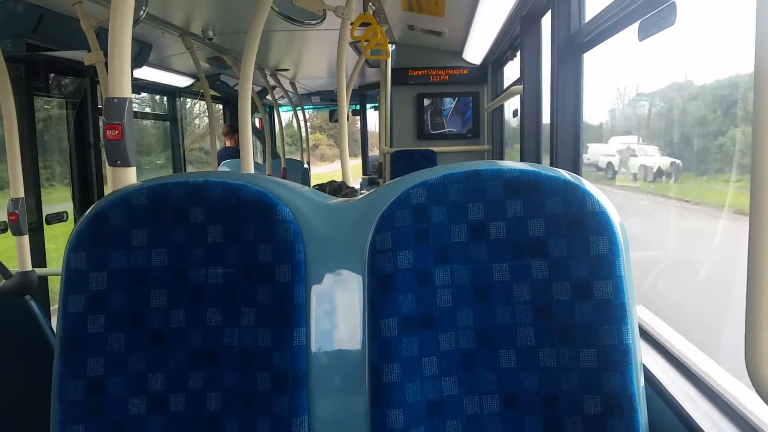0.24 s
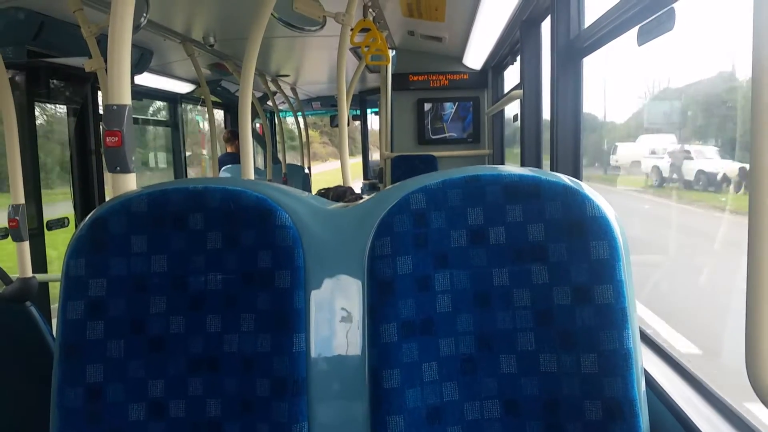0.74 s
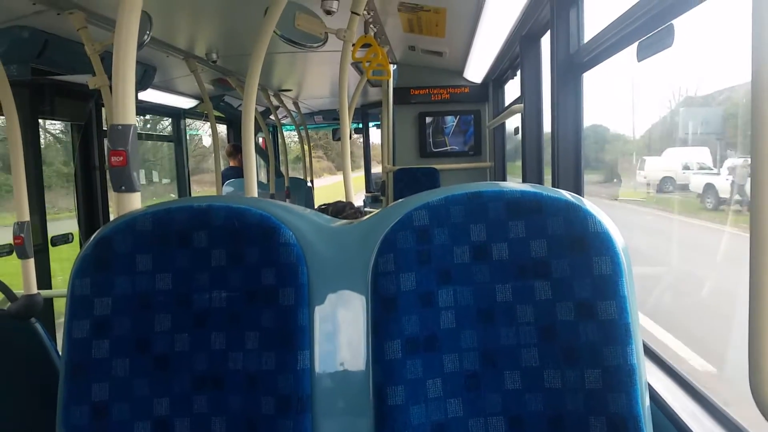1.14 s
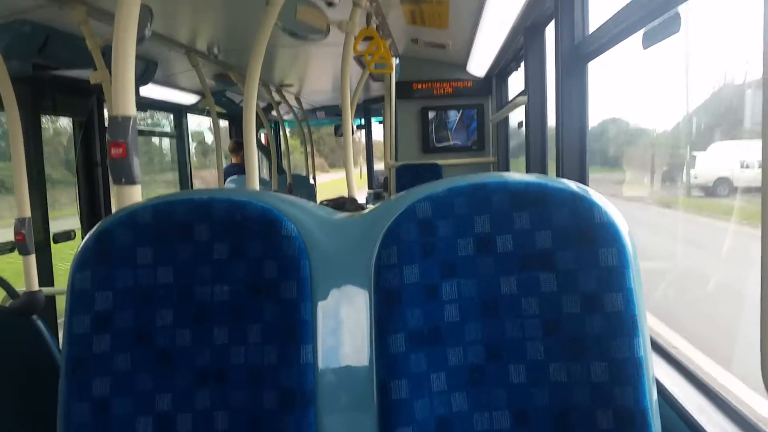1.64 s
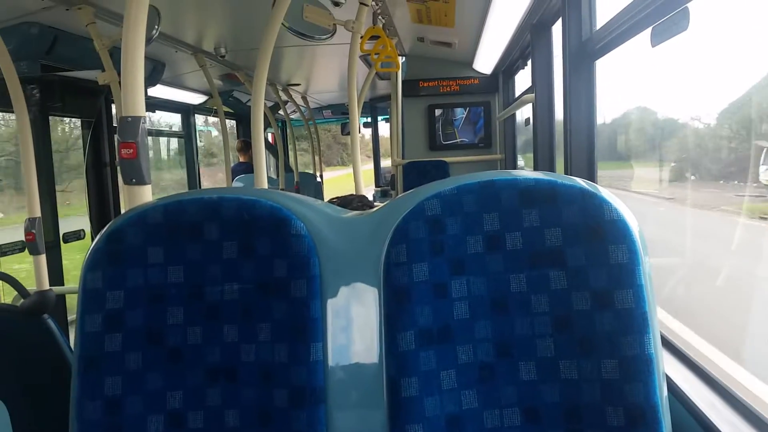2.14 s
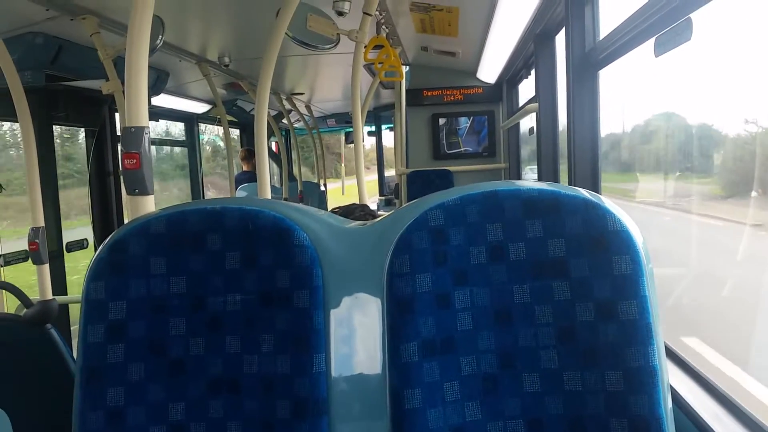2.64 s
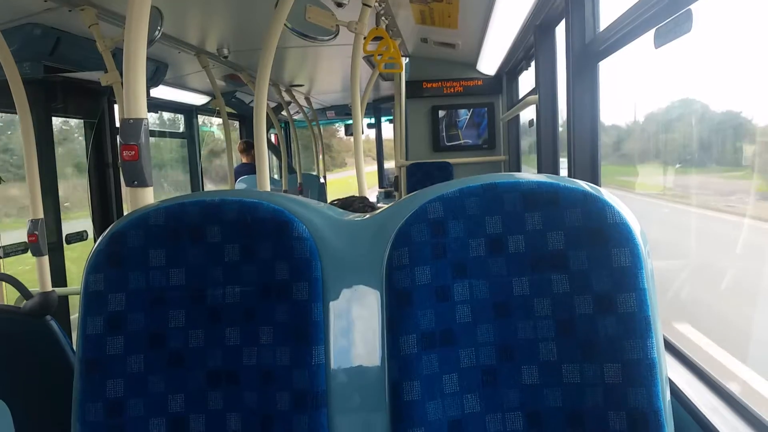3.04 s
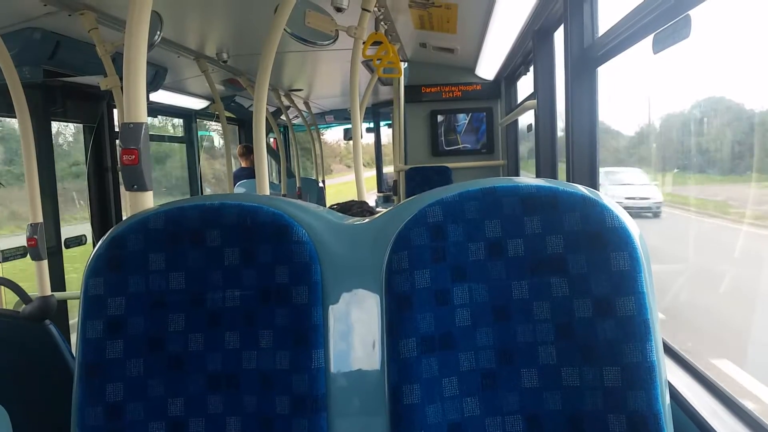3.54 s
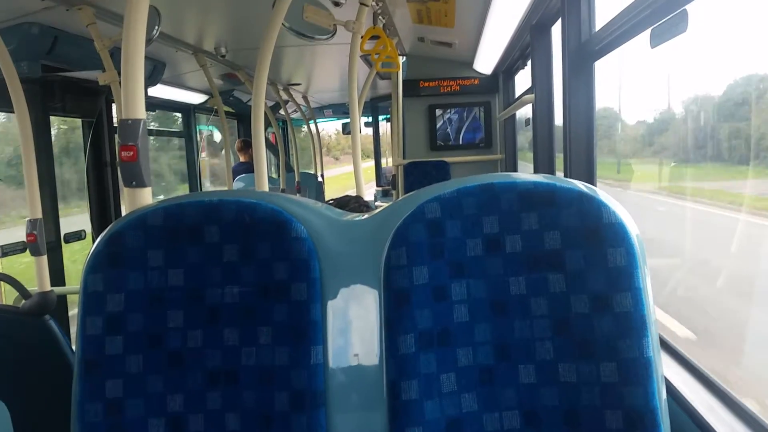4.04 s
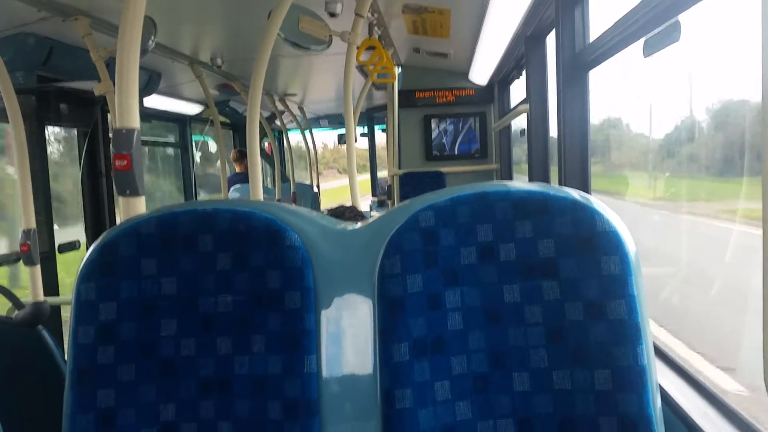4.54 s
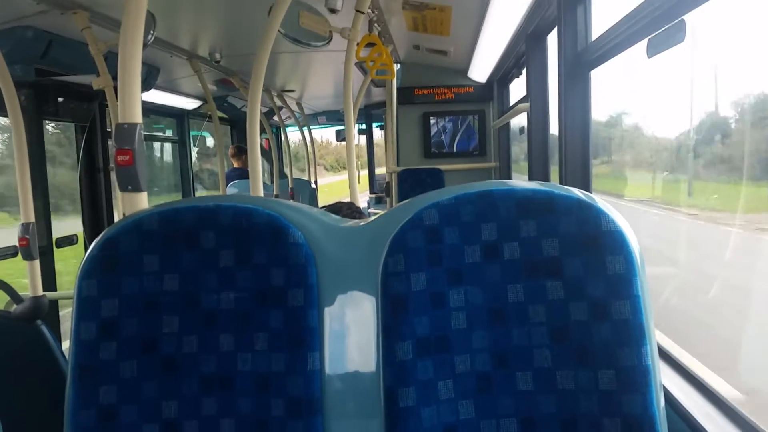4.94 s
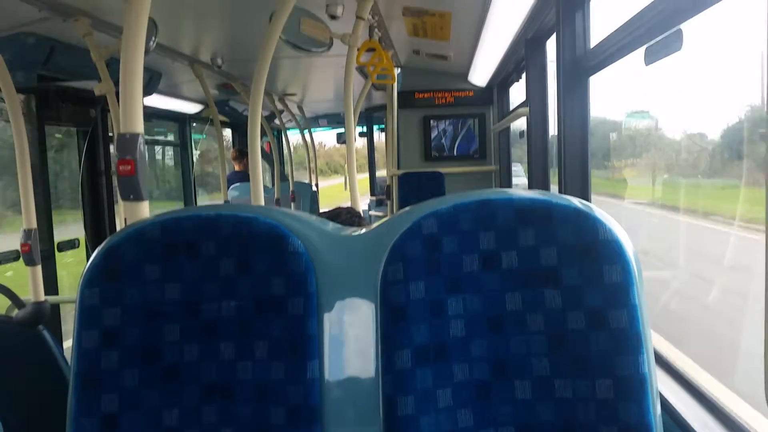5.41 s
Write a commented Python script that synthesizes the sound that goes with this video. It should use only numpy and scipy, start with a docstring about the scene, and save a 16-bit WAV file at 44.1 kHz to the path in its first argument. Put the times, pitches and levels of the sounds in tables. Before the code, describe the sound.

From a rear seat inside a bus, a low diesel drone pulses steadily and rises slightly as the vehicle gathers speed in one gear. Road rumble and tyre noise fill the cabin, along with a faint gear whine, a thin high whistle and a light hiss. Bumps bring two spells of brief rattling from loose fittings, with a smoother stretch and one sharp click between them.

```python
"""A six-cylinder diesel engine drones inside a bus that slowly gathers speed in one gear.
Its harmonics beat once per cycle and sweep through the cabin's standing waves, while its firings
modulate a roar. Pump hum, gear whine and a thin turbocharger whistle rise with it; a fan holds its pitch.
Beneath them the uneven road forces the body to rumble, loose trim rattles on the bumps, and air hisses."""
import sys
import numpy as np
from scipy import signal
from scipy.fft import rfft, irfft, next_fast_len
from scipy.io import wavfile

SR = 44100
rng = np.random.default_rng(int(sys.argv[2]) if len(sys.argv) > 2 else 0)


def inscribe(sig):
    """Save sig as 16-bit PCM at rate SR to the path in sys.argv[1].

    A 1-D sig is mono; a 2-D sig holds one channel per row.
    Samples are clipped to [-1, 1] before scaling.
    """
    pcm = np.round(np.clip(np.atleast_2d(sig).T, -1, 1) * 32767)
    wavfile.write(sys.argv[1], SR, pcm.astype(np.int16))


N = 250047
TIME, HZ = np.arange(N) / SR, np.fft.rfftfreq(N, 1 / SR)

# Likeness of left and right in the cabin's sound field: [f/Hz, correlation]
COHERENCE = [(60, 0.96), (99, 0.94), (160, 0.85), (270, 0.86), (450, 0.8), (740, 0.5), (1220, 0.06),
             (2010, -0.03), (3330, 0.0), (5500, 0.0), (9080, 0.02), (15000, 0.03)]
# Balance of that field: [f/Hz, left minus right/dB]
BALANCE = [(60, -0.5), (92, -0.5), (140, -1.0), (210, -1.0), (330, 1.0), (500, 2.0), (770, -0.5),
           (1170, -0.5), (1790, -2.0), (2740, -5.0), (4190, -7.5), (6410, -5.5), (9810, 3.5), (15000, 1.0)]
# Standing waves of the cabin: [f/Hz, half-width/Hz, gain at the seat/dB]
STANDING_WAVES = [(54.6, 1.2, 3), (82.02, 2.35, 6.5), (247.1, 3.95, 7), (326.5, 10.54, -15), (437, 3.3, 11),
                  (568, 19, 2.5)]
# Spectrum of rushing air: [f/Hz, relative density/dB]
HISS_SPECTRUM = [(1500, -10), (3200, 2), (4400, 1), (4900, -3), (6700, -2), (7600, -6.5), (9500, -3.5),
                 (11000, -12), (13500, -18), (16000, -17)]
# Envelope of the hiss: [t/s, relative level/dB]
HISS_ENVELOPE = [(0.0, -49), (1.56, -48.5), (2.15, -51), (4.23, -51.5), (4.45, -50), (5.67, -50)]
# Resonances of an air leak: [f/Hz, half-width/Hz, relative level/dB]
LEAK_RESONANCES = [(2930, 113, 10), (4160, 81, 4), (11600, 750, 2), (14900, 500, -11)]
# Heave of the body on the uneven road: [t/s, relative level/dB]
ROAD_BUMPS = [(0.0, -22.5), (0.54, -31.8), (1.02, -20.3), (1.5, -18.2), (2.22, -23.1), (2.46, -29.6),
              (2.62, -25.5), (4.54, -20.3), (4.78, -26.5), (5.1, -17.5), (5.34, -22.4), (5.66, -19.1)]
# Spectrum of the body panels: [f/Hz, relative density/dB]
PANEL_SPECTRUM = [(30, -25), (45, -2), (65, -3.5), (85, -1.5), (110, -4.5), (145, -5.5), (180, -10),
                  (225, -7.5), (280, -16), (350, -17.5), (500, -49), (900, -93)]
# Spectrum of the loose trim: [f/Hz, relative density/dB]
TRIM_SPECTRUM = [(700, -17), (1500, -8), (2100, -1), (2800, -3), (4400, -4.5), (7000, -5), (9500, -0.5),
                 (12000, -7), (16000, -13.5)]
# Rattles of the trim: [t/s, level before the envelope/dB, decay time/s, tilt/(dB per octave)]
TRIM_RATTLES = [(0.031, -41, 0.028, -3), (.28, -40.5, 0.015, 5), (0.32, -38, 0.014, -2),
                (.405, -43, 0.029, 12), (0.528, -39, 0.037, 1), (.553, -36.5, 0.023, -3),
                (1.092, -34, 0.053, -1), (1.117, -31, .045, -10), (1.299, -38, 0.032, 7),
                (1.33, -37.5, .037, 0), (1.378, -38, 0.045, 7), (1.4, -35, 0.031, -4),
                (1.46, -38.5, 0.089, 0), (1.515, -37.5, 0.048, 1), (1.551, -37, .04, -7),
                (4.336, -41.5, 0.028, -1), (4.402, -29.5, 0.044, -4), (4.413, -28.5, 0.037, -5),
                (4.511, -34, 0.026, -2.5), (4.665, -41, 0.043, 1), (4.82, -46, .04, 0),
                (4.885, -30.5, 0.0085, -5), (5.268, -46, .025, 4), (5.418, -40.5, .02, -2),
                (5.455, -43, .03, 1)]
# Single impacts of a small part: [t/s, level of the snap/dB, f/Hz]
TRIM_TICKS = [(0.79, -32, 5900), (1.0945, -35, 5500), (1.329, -29, 7700), (2.9872, -24, 6950),
              (2.989, -38, 14000), (2.99, -26.5, 3900), (3.127, -36, 7200), (4.256, -37, 6500),
              (5.243, -32, 6500)]
# Partials of an electric fan: [f/Hz, level/dB]
FAN_PARTIALS = [(2197, -51.5), (4394, -64.5), (6591, -65.5)]
# Envelope of the gear whine: [t/s, relative level/dB]
GEAR_ENVELOPE = [(0, -54), (0.16, -42.5), (0.4, -64), (0.65, -50), (1.2, -46), (1.4, -49), (1.85, -50.1),
                 (2.08, -44), (2.28, -51), (2.5, -39), (2.7, -48.2), (3.0, -47.5), (3.45, -53), (4.03, -45),
                 (4.22, -51.7), (4.56, -41.5), (4.8, -48.5), (5.66, -55)]
# Pump harmonics before the standing waves: [multiple of pump rate, level at MID_SPEED/dB, rise/(dB/Hz)]
PUMP_HARMONICS = [(3, -28, -3), (4, -53.5, -4), (5, -44.5, 3), (6, -47, -3.5), (9, -49.5, -2.5),
                  (12, -51.5, -1), (15, -59.5, -15)]
# Spectrum of tyre roar and engine clatter: [f/Hz, relative density/dB]
ROAR_SPECTRUM = [(200, -30.5), (350, -4.5), (420, -3), (510, 1.5), (600, -4), (730, -4.5), (830, -9),
                 (1000, -8), (1150, -11), (1330, -10.5), (1650, -14.5), (2150, -15), (2600, -23.5),
                 (3600, -39.5), (9000, -59)]
# Resonances of the engine bay: [f/Hz, half-width/Hz, level/dB]
CASING_RESONANCES = [(2004, 68, -46), (2925, 63, -54.5), (4410, 120, -65.5)]
# Engine speed, as the rate of four-stroke cycles: [t/s, f/Hz]
ENGINE_SPEED = [(0.0, 8.615), (0.7, 8.66), (1.4, 8.803), (2.1, 8.899), (2.8, 9.022), (3.5, 9.12),
                (4.2, 9.228), (4.9, 9.353), (5.67, 9.44)]
# Engine harmonics before the standing waves: [multiple of cycle rate, level at MID_SPEED/dB, rise/(dB/Hz)]
ENGINE_HARMONICS = [(5, -31.5, 13), (6, -22.5, 12.5), (8, -26, -1.5), (9, -21, 3.5), (10, -24.5, -6.5),
                    (11, -29.5, 0.5), (12, -23.5, -4), (13, -31.5, 11), (14, -30.5, -6), (16, -29.5, 9.5),
                    (17, -29.5, -6), (18, -30, -1), (20, -38.5, -12), (21, -39.5, 2), (23, -32.5, -3.5),
                    (24, -30.5, 0.5), (26, -41.5, 3), (27, -37, 7), (28, -39.5, -13), (29, -42, -18.5),
                    (32, -39, -9.5), (39, -50, -18.5)]
MID_SPEED = 9.03  # cycle rate/Hz in mid-climb; every rise is per Hz of cycle rate above it


def gain_of(db):
    """Amplitude grows tenfold with every 20 dB."""
    return 10 ** (np.asarray(db) / 20)


def unit_rms(x):
    """Normalisation to a mean square of 1."""
    return x / np.sqrt(np.mean(x ** 2) + 1e-20)


def spectrum(points, hz):
    """Interpolation of a table on a logarithmic frequency axis."""
    f, value = np.transpose(points)
    return np.interp(np.log(hz + 1), np.log(f + 1), value)


def curve(points):
    """Linear interpolation of a time table at every sample."""
    return np.interp(TIME, *np.transpose(points))


def add(mix, start_s, sound):
    """Superposition of a stereo sound on the mix."""
    part = mix[:, max(0, round(start_s * SR)):][:, :sound.shape[1]]
    part += sound[:, :part.shape[1]]


def drift(cutoff_hz, size=2048):
    """Low-pass filtered noise gives a slow random motion of rms 1."""
    hz = np.arange(size // 2 + 1) * SR / N
    slow = irfft(rfft(rng.standard_normal(size)) / (1 + (hz / cutoff_hz) ** 4))
    return unit_rms(np.interp(np.arange(N) * size / N, np.arange(size), slow))


def resonance_db(hz, centre_hz, half_width_hz):
    """A resonance curve, 6 dB down at one half-width from its centre."""
    return -20 * np.log10(1 + ((hz - centre_hz) / half_width_hz) ** 2)


def level_at_seat(hz, db, rise_db, speed):
    """A tone's level follows engine speed, and standing waves reinforce or cancel it at the seat."""
    waves_db = sum(lift * np.exp(-((hz - centre) / width) ** 2) for centre, width, lift in STANDING_WAVES)
    return db + rise_db * (speed - MID_SPEED) + waves_db


def diffuse_noise(shape_db):
    """A diffuse field of rms 1: left and right are coherent in the bass, independent in the treble."""
    size = next_fast_len(N, True)
    hz = np.fft.rfftfreq(size, 1 / SR)
    left, independent = rfft(rng.standard_normal((2, size)))
    coherence = np.clip(spectrum(COHERENCE, hz), -1, 1)
    right = coherence * left + np.sqrt(1 - coherence ** 2) * independent
    lean = gain_of(spectrum(BALANCE, hz) / 2)
    pair = np.array([left * lean, right / lean]) * gain_of(np.interp(hz, HZ, shape_db))
    return unit_rms(irfft(pair, size)[:, :N])


def resonant_noise(modes):
    """Resonances under random excitation each give a band of noise."""
    return sum(gain_of(db) * diffuse_noise(resonance_db(HZ, hz, width)) for hz, width, db in modes)


def tone(hz, db, wobble_hz, flutter, lean_db, lag_rad):
    """Interference with shifting reflections makes a tone flutter; left and right differ in phase."""
    phase = 2 * np.pi * np.cumsum(hz + wobble_hz * drift(8.6)) / SR
    sides = []
    for lag in (0, lag_rad):
        reflections = drift(30) * np.cos(phase) + drift(30) * np.sin(phase)
        sides.append(np.cos(phase + lag) + flutter * reflections)
    return gain_of(db) * unit_rms(np.array(sides) * gain_of([[lean_db / 2], [-lean_db / 2]]))


def air(swell_at_s=2.4, swell_half_width_s=0.3):
    """Rushing air radiates broadband hiss; a resonant leak swells once above a steady trickle."""
    hiss = diffuse_noise(spectrum(HISS_SPECTRUM, HZ)) * gain_of(curve(HISS_ENVELOPE) + 4 + 1.4 * drift(20))
    swell = np.exp(-((TIME - swell_at_s) / swell_half_width_s) ** 4)
    return hiss + resonant_noise(LEAK_RESONANCES) * (gain_of(-79) + gain_of(-64.5) * swell)


def road(speed):
    """Forced vibration: the uneven road heaves the body on its springs and shakes its panels."""
    bumps_db = curve(ROAD_BUMPS)
    heave = gain_of(bumps_db + 0.5) * diffuse_noise(resonance_db(HZ, centre_hz=33.5, half_width_hz=12.3))
    panels_db = -19 + 0.12 * (bumps_db - bumps_db.mean()) + 2 * (speed - MID_SPEED)
    return heave + gain_of(panels_db) * diffuse_noise(spectrum(PANEL_SPECTRUM, HZ))


def rattle(level_db, decay_s, tilt_db, rise_s=0.00096, size=16384):
    """A dense run of tiny impacts excites loose trim, and damping makes it die away exponentially."""
    t, hz = np.arange(size) / SR, np.fft.rfftfreq(size, 1 / SR)
    contact_db = np.minimum(6 * rng.standard_normal(size // 64), 10)
    contacts = rng.standard_normal((2, size)) * np.repeat(gain_of(contact_db), 64)
    colour = gain_of(spectrum(TRIM_SPECTRUM, hz) + tilt_db * np.log2(np.maximum(hz, 1500) / 6000))
    sides = gain_of(spectrum(BALANCE, hz) * np.array([[.5], [-.5]]))
    chatter = unit_rms(irfft(rfft(contacts) * colour * sides))
    return gain_of(level_db) * chatter * (1 - np.exp(-t / rise_s)) * np.exp(-t / decay_s)


def tick(level_db, pitch_hz, snap_s=0.001, echo_s=0.02, lean_db=-6, size=4096):
    """One hard impact of a small part gives a broadband snap, followed by brief reverberation."""
    t, hz = np.arange(size) / SR, np.fft.rfftfreq(size, 1 / SR)
    low_cut = 1 / (1 + (pitch_hz / 2 / (hz + 1)) ** 8)
    colour = gain_of(resonance_db(hz, pitch_hz, pitch_hz / 2)) * low_cut
    burst = unit_rms(irfft(rfft(rng.standard_normal((2, size))) * colour))
    envelope = np.exp(-t / snap_s) + gain_of(-17) * np.exp(-t / echo_s)
    return gain_of(level_db) * burst * envelope * gain_of([[lean_db / 2], [-lean_db / 2]])


def loose_trim(jiggles=40, jiggle_db=-57):
    """Impact noise: distinct rattles and ticks stand above faint jiggles at random times."""
    out = np.zeros((2, N))
    for start_s, *settings in TRIM_RATTLES:
        add(out, start_s, rattle(*settings))
    for start_s, *settings in TRIM_TICKS:
        add(out, start_s, tick(*settings))
    for when, strength in rng.random((jiggles, 2)):
        jiggle = rattle(jiggle_db + 6 * (strength - .5), decay_s=.02, tilt_db=3, rise_s=.01)
        add(out, when * N / SR, jiggle)
    return out


def fan():
    """Steady rotation of an electric fan gives harmonics that hold their pitch."""
    return sum(tone(hz, db, wobble_hz=hz / 900, flutter=.35, lean_db=-8, lag_rad=1.2)
               for hz, db in FAN_PARTIALS)


def turbocharger(speed, duct_hz=9280):
    """A rising whistle fades in and out, favoured where it crosses a resonance of the intake duct."""
    hz = 9215 + 1510 * (speed - MID_SPEED)
    db = -60 + resonance_db(hz, duct_hz, half_width_hz=800) + 3.5 * drift(3.8)
    return tone(hz, db, wobble_hz=6, flutter=.35, lean_db=4, lag_rad=1.5)


def gearbox(speed, contacts_per_cycle=221.1):
    """Periodic tooth contact radiates a whine at the mesh frequency."""
    db = curve(GEAR_ENVELOPE) + 1.2
    return tone(contacts_per_cycle * speed, db, wobble_hz=1, flutter=.16, lean_db=-3, lag_rad=.9)


def pump(speed, turns_per_cycle=12.057):
    """A belt-driven pump hums at harmonics of its rotation rate, in constant ratio to the engine."""
    out = np.zeros((2, N))
    for harmonic, db, rise_db in PUMP_HARMONICS:
        order = harmonic * turns_per_cycle
        hz = order * speed
        level_db = level_at_seat(hz, db, rise_db, speed) + drift(0.96)
        out += tone(hz, level_db, wobble_hz=order / 150, flutter=.1, lean_db=0, lag_rad=order / 250)
    return out


def roar_and_clatter(cycles, cylinders=6, depth=0.16):
    """Amplitude modulation at the firing rate pulses the roar and the resonances of the engine bay."""
    firing = 1 + depth * np.cos(2 * np.pi * cylinders * cycles)
    roar = diffuse_noise(spectrum(ROAR_SPECTRUM, HZ))
    roar *= gain_of(-30.5 + .5 * drift(11) + np.linspace(.4, -.4, N))
    casing = resonant_noise(CASING_RESONANCES) * gain_of(1.4 * drift(7.7))
    return (roar + casing) * firing


def engine_drone(speed, cycles, unsteadiness=.08, spread_rad_per_hz=.0013):
    """Neighbouring harmonics of the engine cycle beat, so the drone throbs once per cycle."""
    out = np.zeros((2, N))
    for order, db, rise_db in ENGINE_HARMONICS:
        hz = order * speed
        phase = 2 * np.pi * (order * cycles + rng.random()) + unsteadiness * drift(14)
        rms = gain_of(level_at_seat(hz, db, rise_db, speed)) * (1 + unsteadiness * drift(3.9))
        # Shorter waves differ more in phase between left and right.
        offset = spread_rad_per_hz * hz.mean() * rng.choice([-1, 1])
        out += np.sqrt(2) * rms * np.cos([phase + offset, phase - offset])
    return out


def scene():
    """Superposition of all sources at a seat near the back."""
    speed = curve(ENGINE_SPEED)
    cycles = np.cumsum(speed) / SR
    engine = engine_drone(speed, cycles) + roar_and_clatter(cycles)
    machinery = pump(speed) + gearbox(speed) + turbocharger(speed) + fan()
    return engine + machinery + road(speed) + air() + loose_trim()


def record(dry, fade_s=.004, cutoff_hz=15850):
    """Soft saturation rounds the highest peaks; the ends fade and a low-pass filter limits the band."""
    rounded = dry / (1 + dry ** 10) ** .1
    to_nearest_end_s = np.minimum(TIME, TIME[::-1])
    fade = np.sin(np.pi / 2 * np.minimum(to_nearest_end_s / fade_s, 1)) ** 2
    low_pass = signal.firwin(511, cutoff_hz, window=("kaiser", 9), fs=SR)
    return signal.oaconvolve(fade * rounded, low_pass[None], "same")


dry = scene()
out = record(dry)
inscribe(out)
```